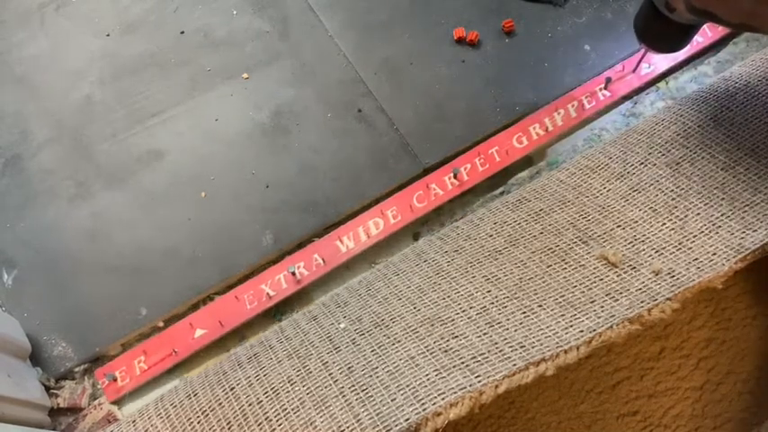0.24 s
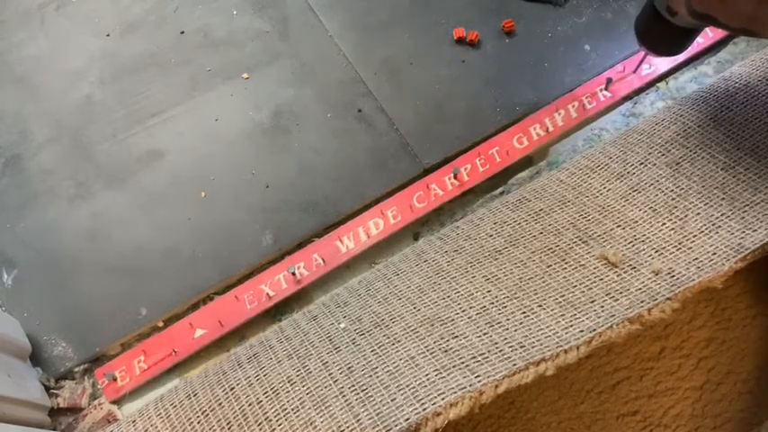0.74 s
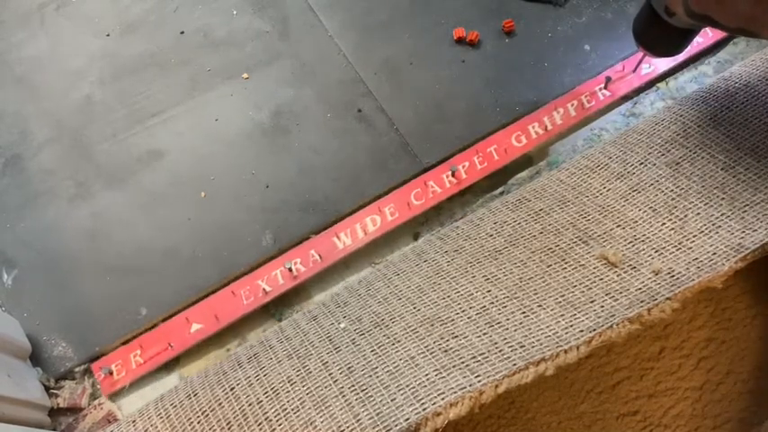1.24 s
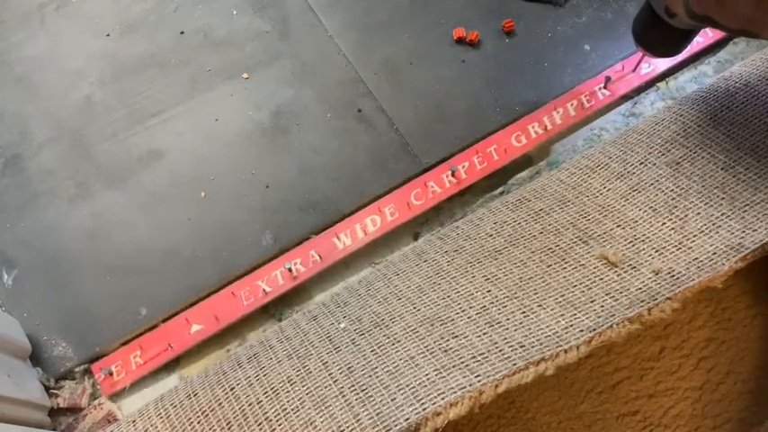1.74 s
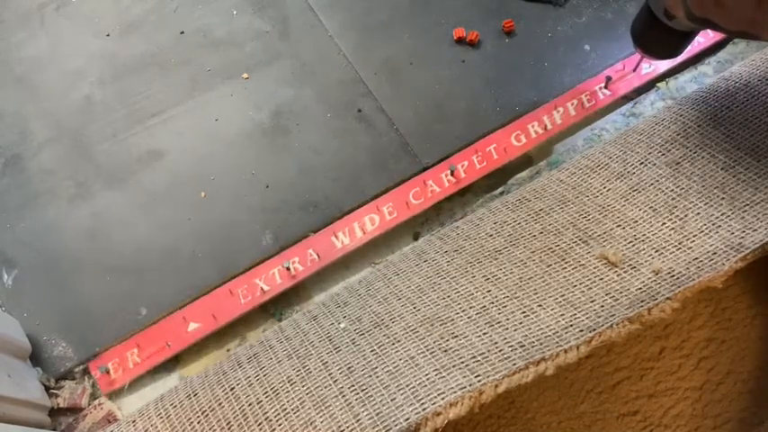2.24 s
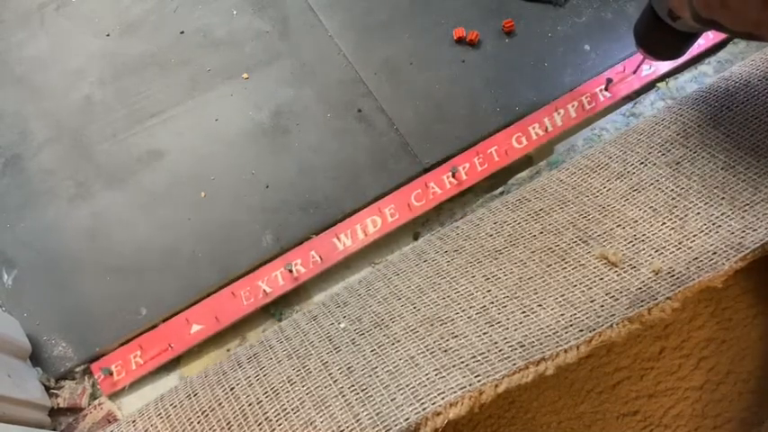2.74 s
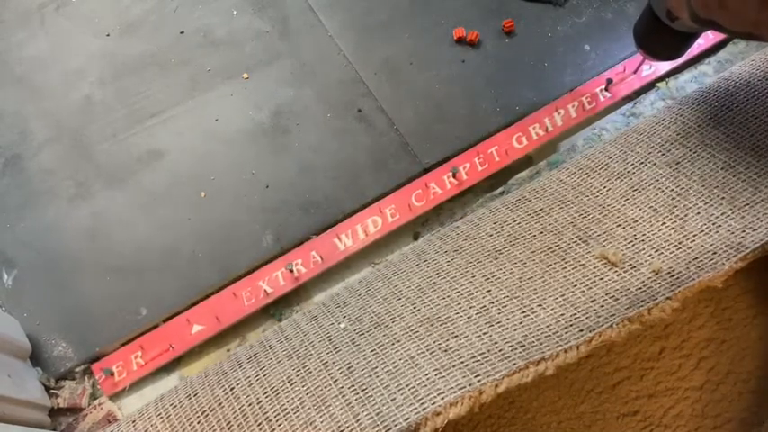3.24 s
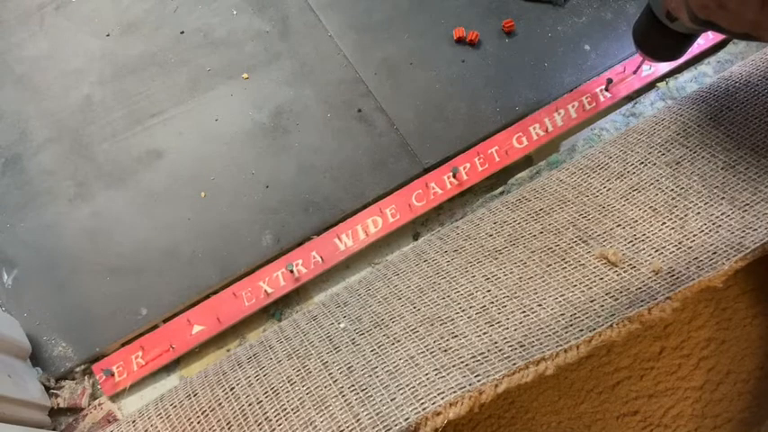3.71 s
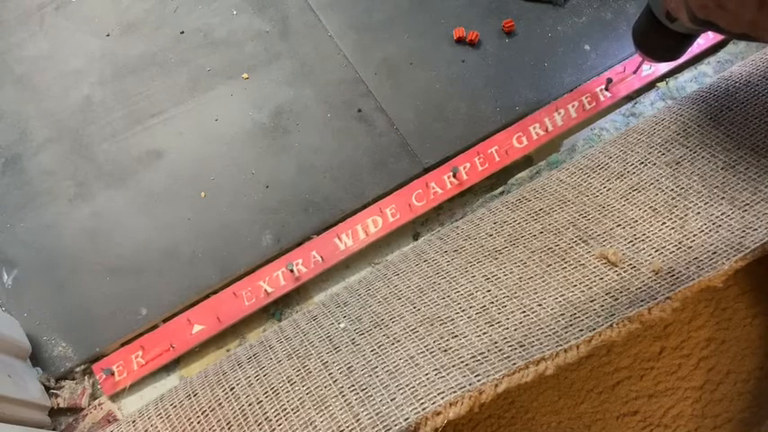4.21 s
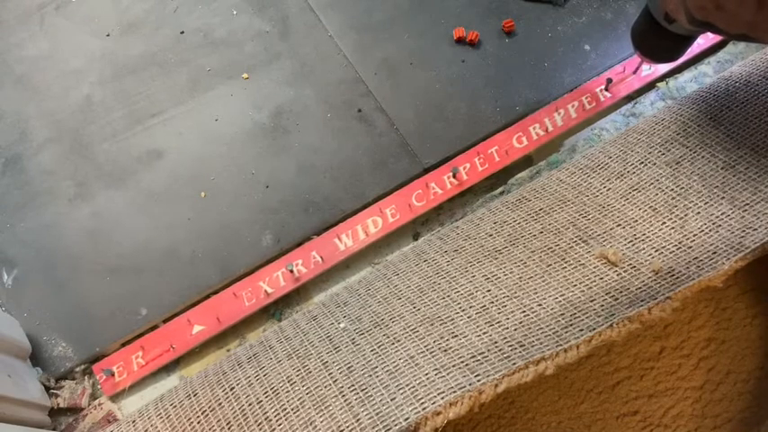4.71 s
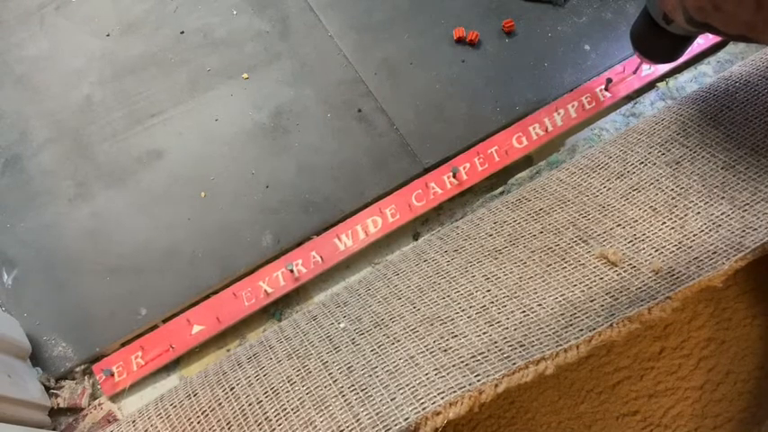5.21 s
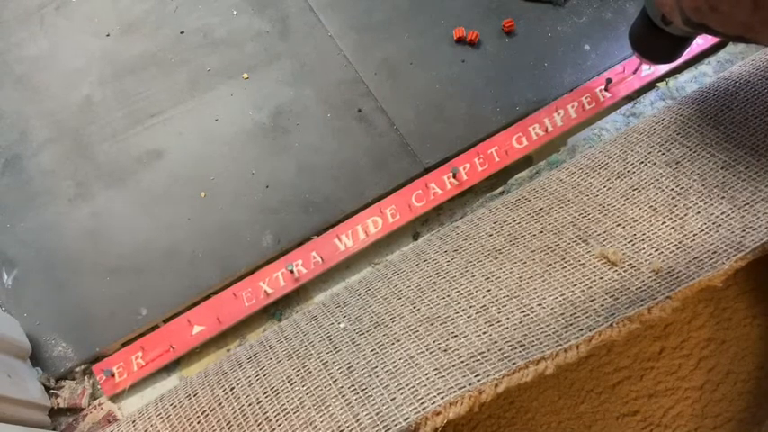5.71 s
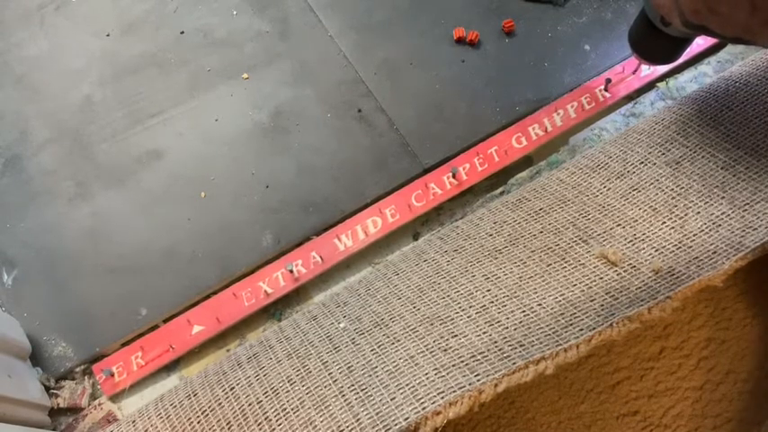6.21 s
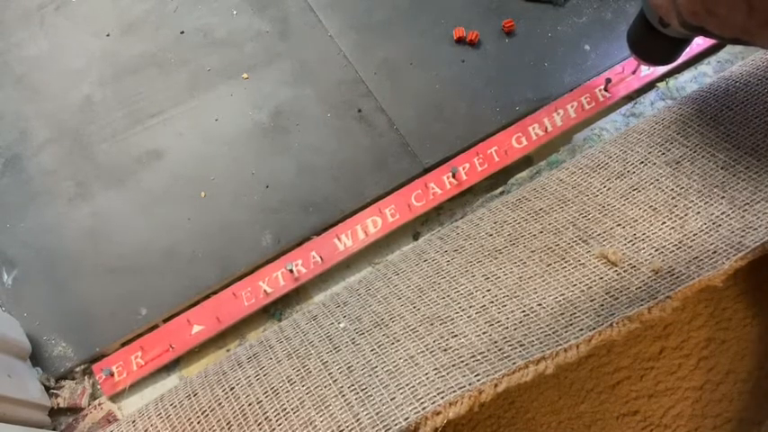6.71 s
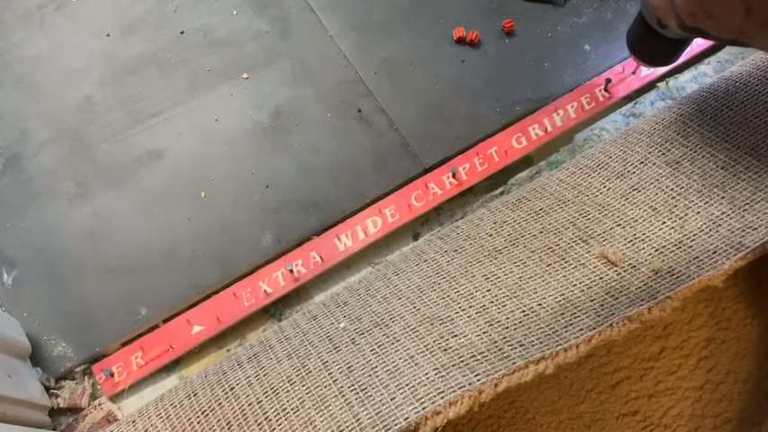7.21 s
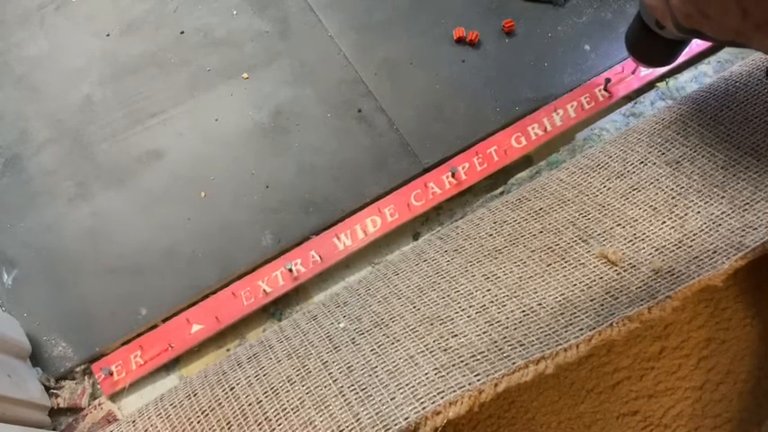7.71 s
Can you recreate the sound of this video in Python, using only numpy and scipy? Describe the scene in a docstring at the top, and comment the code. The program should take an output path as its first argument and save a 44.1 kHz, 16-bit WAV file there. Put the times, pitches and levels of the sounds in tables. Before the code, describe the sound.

A corded hammer drill bores continuously through a thin wooden strip into a concrete floor, close to the microphone in a bare room. Blows blur into a harsh metallic rattle over a low woody buzz, with gear whine and gritty hiss. The bit chatters now and then. After about five seconds the motor is loaded, the pitch drops, and the bit bites and snags until the end.

```python
"""A bare room, close to a camera: a corded hammer drill bores through a wooden strip into a concrete floor.
Its ratchet strikes about 260 times a second: pulses ring the tool, noise that dips at each blow makes the
rattle, noise puffs make the grit, sines at multiples of the blow rate make the strip's buzz and the gear whine.
In spells the bit chatters. After five seconds it is pressed harder: the motor sags to about 220 blows a second,
the buzz drops in pitch and thins, its octave and third multiple standing out, and the bit bites and snags."""
import sys
import numpy as np
from scipy import signal
from scipy.fft import rfft, irfft, next_fast_len
from scipy.io import wavfile
from scipy.ndimage import map_coordinates

SR = 44100
rng = np.random.default_rng(int(sys.argv[2]) if len(sys.argv) > 2 else 0)


def bounce(signal):
    """Save signal as a 16-bit WAV file at the path given by the first command-line argument."""
    frames = np.transpose(np.atleast_2d(signal))
    limited = np.clip(frames, -1, 1)
    pcm = np.round(limited * 32767).astype(np.int16)
    wavfile.write(sys.argv[1], SR, pcm)


N = 350595


def amp(db):
    """Decibels to gain."""
    return 10 ** (np.asarray(db) / 20)


def unit(x):
    """x at rms 1."""
    return x / np.sqrt(np.mean(x ** 2) + 1e-20)


def along(points, hz):
    """(Hz, value) points read on a log axis."""
    f, v = np.transpose(points)
    return np.interp(np.log(hz + 1), np.log(f + 1), v)


def curves(rows):
    """One value per sample for each column after the time."""
    s, *cols = np.transpose(rows)
    return [np.interp(np.arange(N) / SR, s, c) for c in cols]


def wobble(knots_per_s):
    """A smooth random curve through normal knots."""
    knots = rng.standard_normal(int(N * knots_per_s / SR) + 4)
    return map_coordinates(knots, [np.arange(N) * knots_per_s / SR])


def filtered(x, response):
    """x times a complex response of frequency."""
    m = 2 * next_fast_len(N // 2 + SR // 4)
    return irfft(rfft(x, m) * response(np.fft.rfftfreq(m, 1 / SR)), m)[..., :N]


def coloured(x, spectrum):
    """x through a causal minimum-phase filter with the given (Hz, dB) shape, at rms 1."""
    size = 4096
    log_gain = np.log(amp(along(spectrum, np.fft.rfftfreq(size, 1 / SR))))
    cepstrum = irfft(log_gain)
    fold = np.r_[1, np.full(size // 2 - 1, 2), 1, np.zeros(size // 2 - 1)]
    ring = irfft(np.exp(rfft(cepstrum * fold)))
    return unit(signal.fftconvolve(np.atleast_2d(x), ring[None], axes=1)[:, :N])


def pressed(x, light, hard, load):
    """The colour of x passes from the light to the hard spectrum with the load."""
    return (1 - load) * coloured(x, light) + load * coloured(x, hard)


def leading(x, lead_s):
    """Stereo x that reaches the right port lead_s before the left."""
    return filtered(x, lambda hz: np.exp(1j * np.pi * hz * lead_s * np.array([[-1], [1]])))


def spells(rows, edge_s):
    """Each (start, length, strength) spell rises over edge_s, holds and lets go."""
    t = np.arange(N) / SR
    total = 0
    for start, length, strength in rows:
        inside_s = np.minimum(t - start, start + length - t)
        total = total + strength * np.clip(inside_s / edge_s + .5, 0, 1)
    return total


def bumps(rows, sigma_s, delay_s=0):
    """A brief Gaussian bump for each (s, height) row, delay_s after it."""
    t = np.arange(N) / SR - delay_s
    return sum(height * np.exp(-.5 * ((t - s) / sigma_s) ** 2) for s, height in rows)


def pulses(at, sizes):
    """Band-limited clicks at fractional sample positions."""
    taps = np.floor(at)[:, None] + np.arange(-7, 9)
    offset = taps - at[:, None]
    shape = np.sinc(offset) * np.cos(np.pi * offset / 16) ** 2
    index = np.clip(taps, 0, N).astype(int)
    return np.bincount(index.ravel(), (sizes[:, None] * shape).ravel(), N + 1)[:N]


def puffs(cycles, depth_db, length_cycles):
    """Envelope of rms 1 that jumps at every count (dips if depth_db is negative), then relaxes."""
    return unit(amp(depth_db * np.exp(-(cycles % 1) / length_cycles)))


# Ratchet speed before sway and sags. Each row: time in seconds, blows per second in Hz.
SPEED_HZ = [(0.0, 269.4), (0.66, 263.5), (1.48, 265.1), (2.44, 260.3), (3.19, 262.6), (3.36, 263.2),
            (3.56, 253.6), (3.87, 260.6), (3.98, 255.4), (4.14, 261.5), (4.29, 262), (4.34, 257.8),
            (4.4, 261.8), (4.89, 255.2), (4.98, 256.8), (5.12, 248.5), (5.205, 245.3), (5.232, 232.4),
            (5.36, 229.1), (5.56, 225), (6.24, 222.5), (6.75, 223.7), (6.82, 221.7), (7.06, 224.5),
            (7.55, 220.1), (7.95, 219.4)]
SNAG_SAG_HZ = 4  # at snag strength 1


def blow_rate():
    """Blows a second: the speed of the motor, sagging at each snag."""
    speed_hz, = curves(SPEED_HZ)
    return speed_hz - SNAG_SAG_HZ * snags()


BLOWS_PER_TURN = 15


def turning(cycles, second=0.82):
    """The unequal teeth of the ratchet come round once per turn of the chuck; rms 1."""
    angle = 2 * np.pi * cycles / BLOWS_PER_TURN
    return unit(np.sin(angle) + second * np.sin(2 * angle + 2 * np.pi * rng.random()))


STUMBLE_CYCLES = .016  # wander of the blow timing at load 1
CHATTER_DEPTH_DB, CHATTER_EARLY_S = 3.5, .00003  # at chatter strength 1
# Rebounds of the bit. Each row: gap after the blow in s, wander of the gap in s, size relative to the blow.
REBOUNDS = [(.0007, .00018, .45), (.0015, .00025, .33)]


def ratchet(load, uneven_db, sway_hz, drift_hz=0.716, jitter_light_s=.000014, jitter_hard_s=.00003,
            scatter_db=1.36, teeth_db=1.0):
    """The running count of blows, the surge of their force, and the blows as pulses with rebounds."""
    speed_hz = blow_rate()
    # the bit binds once per turn of the chuck, so speed and force sway
    chuck = np.sin(2 * np.pi * np.cumsum(speed_hz) / SR / BLOWS_PER_TURN)
    surge = unit(chuck + wobble(70))
    swayed_hz = speed_hz + sway_hz * chuck + drift_hz * wobble(40)
    cycles = np.cumsum(swayed_hz) / SR + STUMBLE_CYCLES * load * wobble(65)
    at = np.interp(np.arange(1, int(cycles[-1])), cycles, np.arange(N))
    i = at.astype(int)
    late, strong = rng.standard_normal((len(at), 2)).T
    jitter_s = jitter_light_s + (jitter_hard_s - jitter_light_s) * load[i]
    # in chatter every second blow is strong and early, the others weak and late
    limp = spells(CHATTERS, CHATTER_EDGE_S)[i] * (-1) ** np.arange(len(at))
    at = at + SR * (jitter_s * late - CHATTER_EARLY_S * limp)
    size_db = scatter_db * strong + teeth_db * turning(cycles)[i]
    size_db = size_db + uneven_db[i] * surge[i] + CHATTER_DEPTH_DB * limp
    sizes = amp(size_db)
    blows = pulses(at, sizes)
    # the wandering gaps make every overtone flutter
    for gap_s, wander_s, size in REBOUNDS:
        blows = blows + pulses(at + SR * (gap_s + wander_s * wobble(36)[i]), size * sizes)
    return cycles, surge, blows


# Shake of the strip at the blow rate. Each row: time in seconds, level in dB before the shake_db offset.
SHAKE_DB = [(0, -25), (0.2, -30), (0.66, -31), (0.79, -39), (0.98, -29.5), (1.14, -37), (1.26, -29.5),
            (1.78, -29.5), (2.06, -37.5), (2.4, -26.5), (3.22, -37), (3.41, -35), (3.48, -26.5),
            (4.08, -27.5), (4.25, -33.5), (4.65, -27), (5.17, -27), (5.7, -36.5), (7.3, -35.5), (7.95, -32)]
# Octave of the strip between bites. Each row: time in seconds, relative level in dB.
OCTAVE_DB = [(0, -31), (.15, -35.5), (.55, -38), (.72, -34.5), (1.12, -35.5), (1.26, -40), (1.58, -41),
             (1.8, -36), (2.28, -33), (2.5, -41.5), (2.72, -33.5), (3.45, -35), (3.8, -41), (4.05, -42),
             (4.17, -35), (4.5, -35), (4.64, -48), (4.95, -35), (5.18, -33.5), (5.3, -37), (7.95, -37.5)]
# Third multiple of the strip between bites. Each row: time in seconds, relative level in dB.
THIRD_DB = [(0, -36), (.33, -51), (.48, -38), (.8, -34), (2.08, -38.5), (2.25, -43), (2.8, -53),
            (3.05, -36), (3.45, -42), (4.8, -45.5), (5.3, -38), (5.6, -34), (7.4, -31), (7.95, -34)]
# Fourth multiple of the strip. Each row: time in seconds, relative level in dB.
FOURTH_DB = [(0.1, -34.5), (0.8, -42), (1.3, -36), (3.0, -34), (3.6, -36), (4.5, -35), (5.1, -37),
             (5.35, -40), (7.4, -39), (7.95, -38)]
# Spells when the loaded bit bites. Each row: start in seconds, length in seconds, relative strength.
BITES = [(5.25, 0.245, 0.74), (5.5, 0.2, 1), (5.775, 0.16, 1.04), (6.045, 0.079, 0.87), (6.15, 0.044, .6),
         (6.275, 0.071, 0.85), (6.39, 0.086, 1.1), (6.53, .06, 0.41), (6.645, 0.169, 1),
         (6.87, 0.098, 0.86), (7.055, 0.105, 1.1), (7.24, 0.07, 1.18), (7.52, 0.48, 0.81)]
BITE_EDGE_S, OCTAVE_BITE_DB, THIRD_LOSS_DB = 0.022, 8, 5.5  # dB at bite strength 1
SNAG_DIP_DB, KICK_DB, KICK_AFTER_S = 6.5, 3.5, 0.051  # dB at snag strength 1


def shake_levels(load, shake_db=1.65):
    """First four multiples in dB: bites lift the octave and cut the third, snags dip all, then kick the first."""
    shake, = curves(SHAKE_DB)
    octave, = curves(OCTAVE_DB)
    third, = curves(THIRD_DB)
    fourth, = curves(FOURTH_DB)
    bite = spells(BITES, BITE_EDGE_S)
    dip = SNAG_DIP_DB * snags()
    first = shake + shake_db + KICK_DB * snags(KICK_AFTER_S)
    octave = octave + OCTAVE_BITE_DB * bite
    third = third - THIRD_LOSS_DB * bite
    return [db - dip for db in (first, octave, third, fourth)]


# Lead of the left port over the right, one row per multiple of the strip.
# Each row: phase lightly pressed in rad, phase hard pressed in rad.
PORT_PHASE_RAD = [(.22, .8), (.3, .2), (0, .7), (-.5, 1)]


def strip(cycles, surge, load, hum_db=-2.1, throb_db=0.16, flutter_light_db=1.2, flutter_hard_db=1.0):
    """The low buzz of the shaken wood; its multiples swell and fade as the contact shifts."""
    flutter_db = flutter_light_db + (flutter_hard_db - flutter_light_db) * load
    hum = 0
    for k, db in enumerate(shake_levels(load), 1):
        # each multiple reaches the two ports slightly out of step
        light, hard = PORT_PHASE_RAD[k - 1]
        lead_rad = light + (hard - light) * load + .15 * np.sqrt(k) * wobble(3)
        apart = lead_rad * np.array([[.5], [-.5]])
        swell = amp(db + np.sqrt(k) * flutter_db * wobble(50))
        hum = hum + swell * np.sin(2 * np.pi * (k * cycles + rng.random()) + apart)
    ease = signal.windows.tukey(N, .002)  # 8 ms fade at each end
    return np.sqrt(2) * amp(hum_db + throb_db * surge) * ease * hum


# Housing resonances that colour the gear whine. Each row: frequency in Hz, level in dB before whine_db.
HOUSING_DB = [(1310, -52), (1345, -46), (1400, -52), (1500, -46), (1560, -38), (1592, -36.5), (1625, -46),
              (1970, -49), (2100, -49), (2200, -45), (2310, -38), (2375, -37), (2400, -33.5), (2425, -39),
              (2650, -58), (3050, -60), (3145, -53), (3195, -46), (3230, -35), (3330, -53), (3445, -44),
              (3600, -55), (5100, -56), (5280, -48), (5500, -54), (5810, -44), (5980, -46), (6200, -56)]
# Lowest gear whine, the fifth multiple. Each row: time in seconds, level in dB before fifth_db.
FIFTH_DB = [(0, -36.5), (0.35, -36), (0.8, -41.5), (2.2, -42), (2.5, -52), (2.85, -39.5), (3.35, -36.5),
            (3.8, -45), (4.95, -39), (5.17, -33.5), (5.35, -33.5), (6.6, -34.5), (7.2, -36), (7.95, -43)]


def gears(cycles, whine_db=0.5, fifth_db=-1, flutter_db=2.0, throb_db=1.0, backlash_cycles=0.037):
    """Whines at multiples of the blow rate swell at housing resonances; chuck throbs them, backlash roughens."""
    speed_hz = blow_rate()
    levels_db = {k: whine_db + along(HOUSING_DB, k * speed_hz) for k in (6, 9, 12, 13, 20, 22)}
    levels_db[5] = fifth_db + curves(FIFTH_DB)[0]
    whine = 0
    for k, db in levels_db.items():
        throb = turning(cycles + BLOWS_PER_TURN * rng.random())
        swell = amp(db + flutter_db * wobble(45) + throb_db * throb)
        slip = .13 * wobble(11) + backlash_cycles * wobble(60)
        whine = whine + swell * np.sin(2 * np.pi * (k * cycles + rng.random() + slip))
    return np.sqrt(2) * leading(whine, .00003)


# Decay of the bare room. Each row: frequency in Hz, t60 in seconds.
ROOM_T60_S = [(200, 0.42), (1500, 0.1), (10000, 0.075)]
# Strength of the walls' answer. Each row: frequency in Hz, level in dB.
WET_DB = [(500, -12), (1000, -7), (2000, -6), (4500, -3), (8000, -7), (15000, -7)]


def in_room(x):
    """x at both ports plus the walls' answer: decaying noise, different at each port."""
    hz, t, z = signal.stft(rng.standard_normal((2, SR // 3)), SR, nperseg=256)
    fade = amp(-60 * t / along(ROOM_T60_S, hz)[:, None])
    fade = fade / np.sqrt(np.sum(fade ** 2, 1, keepdims=True) * t[1] * SR)
    tail = signal.istft(z * fade * amp(along(WET_DB, hz))[:, None], SR, nperseg=256)[1]
    return x + signal.fftconvolve(np.atleast_2d(x), tail, axes=1)[:, :N]


# Ring of tool and strip, lightly pressed. Each row: frequency in Hz, relative level in dB.
RING_LIGHT_DB = [(300, -75.5), (1080, -18.5), (1220, 1.5), (1320, -7.5), (1572, -3.5), (1834, -2),
                 (2096, -6), (2358, -8), (2640, -10), (2900, -8.5), (3160, -6.5), (3440, -12), (3700, -13),
                 (5764, -12), (9000, -35.5)]
# Ring of tool and strip, hard pressed. Each row: frequency in Hz, relative level in dB.
RING_HARD_DB = [(300, -68), (912, -49.5), (1112, -11), (1335, -4.5), (1558, -3), (1780, -3.5), (2000, -5),
                (2225, -2.5), (2448, -5), (2670, -15), (2892, -6.5), (3782, -28), (4895, -10.5),
                (6230, -20), (9000, -41)]
# Loose rattle of bit and chuck, lightly pressed. Each row: frequency in Hz, relative level in dB.
RATTLE_LIGHT_DB = [(150, -39), (650, -10.5), (1000, -3), (1500, -1), (2000, -2), (2800, -2.5), (3300, -2.5),
                   (3800, -6), (4500, -2), (5300, -9), (5900, -2.5), (6600, -7), (7400, -2), (9000, -50)]
# Loose rattle of bit and chuck, hard pressed. Each row: frequency in Hz, relative level in dB.
RATTLE_HARD_DB = [(150, -47), (700, -7), (1000, -4), (1500, 0.5), (2000, -1.5), (2600, -6), (3100, -2.5),
                  (4000, -5.5), (4800, -3), (5400, -13), (6100, -4.5), (7200, -7), (9000, -46)]


def tool(blows, cycles, load, level_db, ring_db=-2.0, rattle_db=0.0, catch_db=1.23):
    """Blows ring steel and strip; the loose bit rattles as noise that dips at each count and recovers."""
    ring = in_room(pressed(blows, RING_LIGHT_DB, RING_HARD_DB, load))
    ring = leading(ring, .00004)
    scrape = rng.standard_normal((2, N)) * puffs(cycles, depth_db=-2.5, length_cycles=0.2)
    scrape = scrape * amp(catch_db * wobble(500))
    rattle = pressed(scrape, RATTLE_LIGHT_DB, RATTLE_HARD_DB, load)
    return amp(level_db) * (amp(ring_db) * ring + amp(rattle_db) * rattle)


# Hiss of crushed concrete, lightly pressed. Each row: frequency in Hz, relative level in dB.
GRIT_LIGHT_DB = [(4000, -35), (6800, -10), (7700, -5), (8500, -3.5), (9400, 0), (10000, -1), (10800, -4.3),
                 (12000, -4), (12600, -6.3), (14000, -9.5), (14800, -5), (15700, -8)]
# Hiss of crushed concrete, hard pressed. Each row: frequency in Hz, relative level in dB.
GRIT_HARD_DB = [(4000, -35), (6800, -13), (7900, -8.5), (8500, -3.5), (9200, 0), (10000, -2), (10700, -6.5),
                (11800, -10.3), (13500, -13), (14500, -13), (15200, -11), (15700, -12.5)]


def grit(cycles, load, level_db, grit_db=5.5, lumpy_db=0.37, clumpy_db=0.71, apart_db=-7):
    """Concrete crumbles in an uneven puff of hiss at every blow; it reaches the right port first."""
    crush = rng.standard_normal(N) + amp(apart_db) * rng.standard_normal((2, N))
    crush = crush * puffs(cycles, depth_db=9.0, length_cycles=0.46)
    crush = crush * amp(lumpy_db * wobble(400) + clumpy_db * wobble(40))
    hiss = amp(level_db + grit_db) * pressed(crush, GRIT_LIGHT_DB, GRIT_HARD_DB, load)
    return leading(hiss, .000183)


# Dull knocks of the strip on the floor. Each row: frequency in Hz, relative level in dB.
THUD_DB = [(20, -42), (50, -34), (100, -19.5), (150, -11), (200, -1.5), (380, 0), (480, 3), (620, -9),
           (850, -15), (1200, -11), (2500, -43)]
# Bounce of the strip on the floor. Each row: time in seconds, level in dB.
BOUNCE_DB = [(0, -48), (1.6, -47), (2.2, -45), (3.1, -48), (3.7, -44.5), (4.6, -45), (5.15, -38.5),
             (5.5, -51), (5.8, -47), (7.95, -50)]
# Jumps and lulls of the strip. Each row: time in seconds, dB relative to the usual bounce (negative is quieter).
KNOCKS_DB = [(1.675, 5), (2.487, 5), (3.805, 0), (4.7, 2), (5.215, -4), (5.315, 3), (5.385, 3), (5.524, 15),
             (6.31, 10), (6.39, 11), (6.67, 8), (6.77, 9)]
KNOCK_SIGMA_S = 0.013


def thuds(surge, uneven_db, apart_db=-11):
    """The strip bounces in short bunches of low noise swayed by the surge, with a few jumps and a lull."""
    bounce_db, = curves(BOUNCE_DB)
    bunch_db = 3.6 * wobble(55)
    knocks = rng.standard_normal(N) + amp(apart_db) * rng.standard_normal((2, N))
    rumble = coloured(knocks * amp(bunch_db + uneven_db * surge), THUD_DB)
    return amp(bounce_db + bumps(KNOCKS_DB, KNOCK_SIGMA_S) - SNAG_DIP_DB * snags()) * rumble


# Spells when the bit chatters. Each row: start in seconds, length in seconds, relative strength.
CHATTERS = [(0.98, .12, .8), (1.6, .13, 0.55), (1.9, 0.16, 0.8), (2.1, 0.27, 0.65), (2.47, 0.089, .5),
            (3.6, 0.093, 0.44), (3.96, .12, 0.65), (5.03, 0.21, .6)]
CHATTER_EDGE_S = .04


def chatter(cycles, chatter_db=-42):
    """In chatter the strip sounds a rough line halfway between its third and fourth multiples."""
    tone = np.sin(2 * np.pi * 3.5 * cycles)
    return amp(chatter_db + 2.3 * wobble(40)) * spells(CHATTERS, CHATTER_EDGE_S) * tone


# Snags of the bit: motor and buzz dip, then the freed bit kicks the strip.
# Each row: time in seconds, relative strength.
SNAGS = [(5.565, 0.38), (5.748, 0.63), (6.222, 0.86), (6.36, 0.61), (6.497, 0.58), (6.832, 1.06),
         (6.97, 0.518), (7.163, 1.01), (7.32, 0.37), (7.497, .6)]
SNAG_SIGMA_S = .017


def snags(delay_s=0):
    """A brief bump at each snag of the bit, delay_s after it."""
    return bumps(SNAGS, SNAG_SIGMA_S, delay_s)


# How the drill is held. Each row: time in seconds, load 0 to 1,
# force change in dB per unit of surge (negative inverts it), sway of the speed in Hz.
HOLD = [(0, 0, -2, 0.89), (1.5, 0, 0, 1.46), (3.3, 0.2, 0, 1.6), (4.2, 0.26, 1, 1.78), (4.9, 0.01, 0.8, 2),
        (5.15, 0.54, -1.5, 1.52), (5.35, 0.7, 2.5, 1.9), (5.7, 0.83, -1.5, 1.15), (7.3, 0.86, -1.5, 1.68),
        (7.95, 0.59, -4, 1.8)]
# Force of the blows. Each row: time in seconds, level of ring and rattle in dB, level of crushed grit in dB,
# both before the offsets in tool and grit.
FORCE_DB = [(0, -29.5, -30.5), (1.2, -29, -31), (4.8, -28.5, -31.5), (5.18, -28.5, -32), (5.32, -30, -34),
            (7.95, -30, -34)]
# Stereo balance. Each row: frequency in Hz, left minus right in dB.
BALANCE_DB = [(230, 0), (520, .6), (670, 3), (780, -2.5), (1000, 1.5), (1150, .8), (1800, 1.2), (3200, -1),
              (3700, -.3), (4500, -1.7), (5600, -6), (6500, -2.2), (8000, 0)]
SNAG_SOFTEN_DB = 1  # taken from blows, rattle and whine at snag strength 1


def scene():
    """One ratchet drives the strip, the gears, the tool and the grit."""
    load, uneven_db, sway_hz = curves(HOLD)
    load = np.clip(load, 0, 1)
    ring_db, crush_db = curves(FORCE_DB)
    cycles, surge, blows = ratchet(load, uneven_db, sway_hz)
    wood = strip(cycles, surge, load) + chatter(cycles) + thuds(surge, uneven_db)
    steel = gears(cycles) + tool(blows, cycles, load, ring_db)
    steel = amp(-SNAG_SOFTEN_DB * snags()) * steel
    drill = steel + grit(cycles, load, crush_db)
    return filtered(wood + drill, lambda hz: amp(along(BALANCE_DB, hz) * np.array([[.5], [-.5]])))


LOW_CUT_HZ, TOP_HZ = 30, 15780


def record(dry):
    """The camera thins the deep bass and keeps nothing above its band limit."""
    return filtered(dry, lambda hz: 1j * hz / (LOW_CUT_HZ + 1j * hz) * (hz < TOP_HZ))


dry = scene()
out = record(dry)
bounce(out)
```